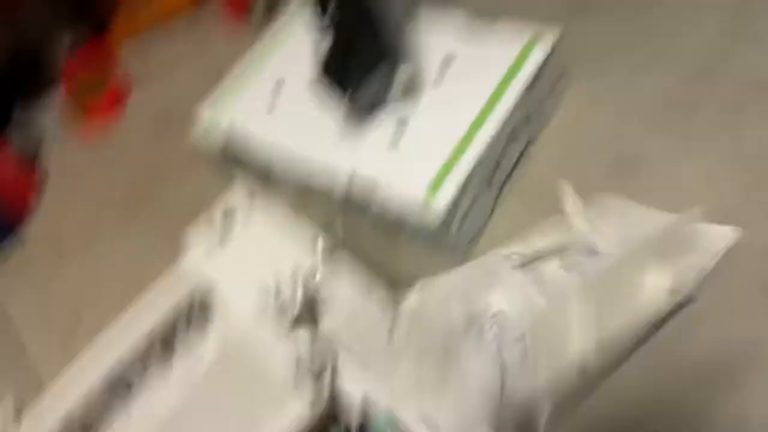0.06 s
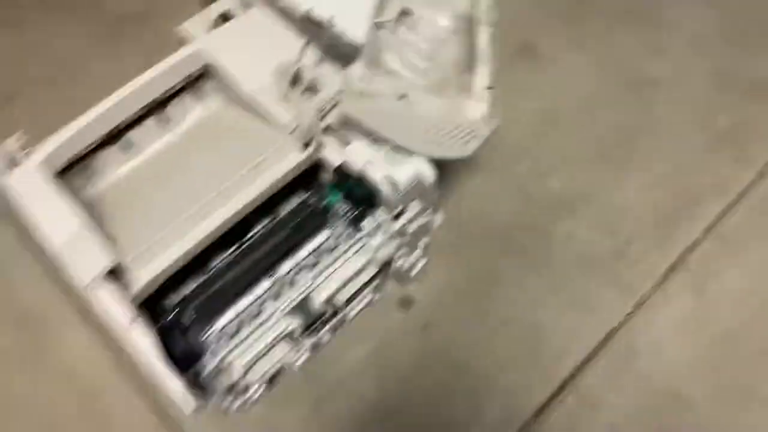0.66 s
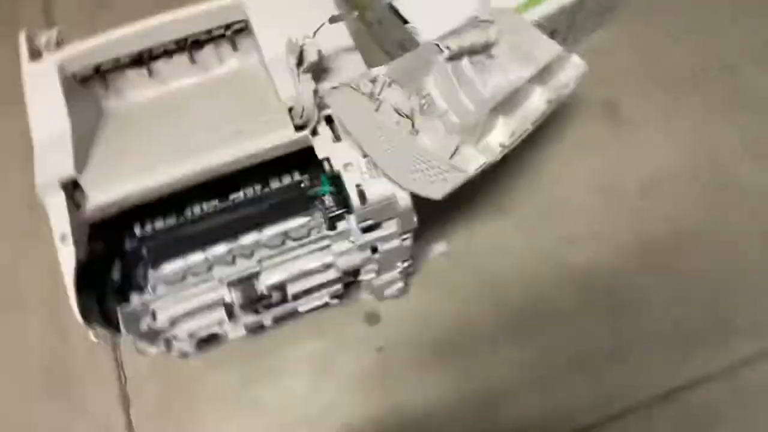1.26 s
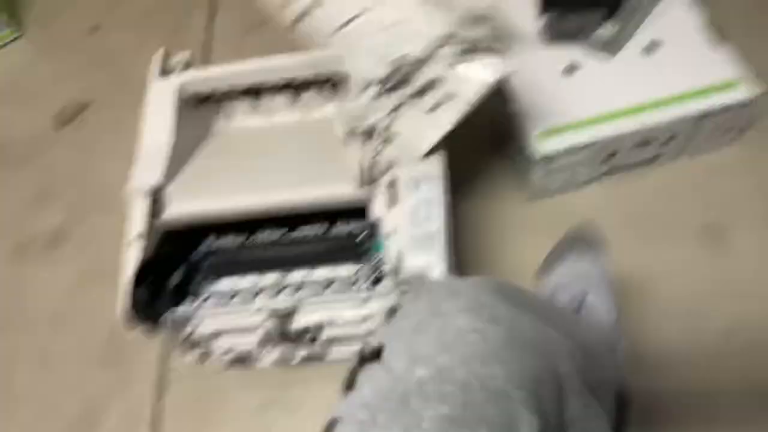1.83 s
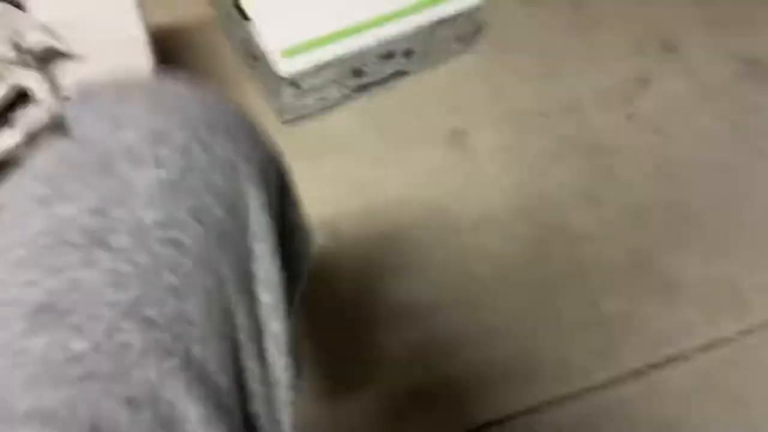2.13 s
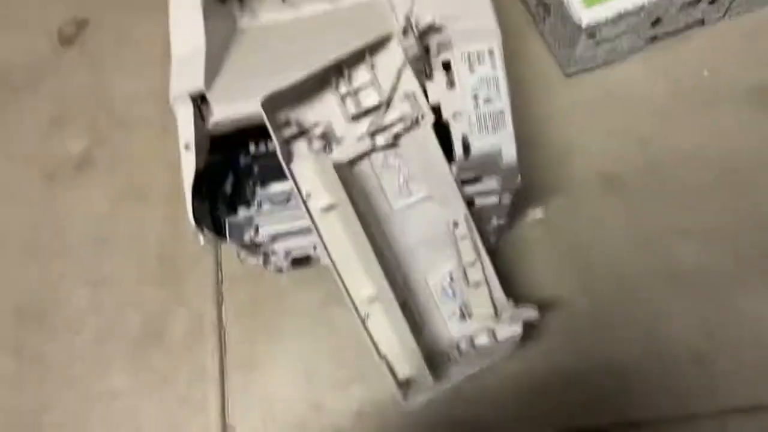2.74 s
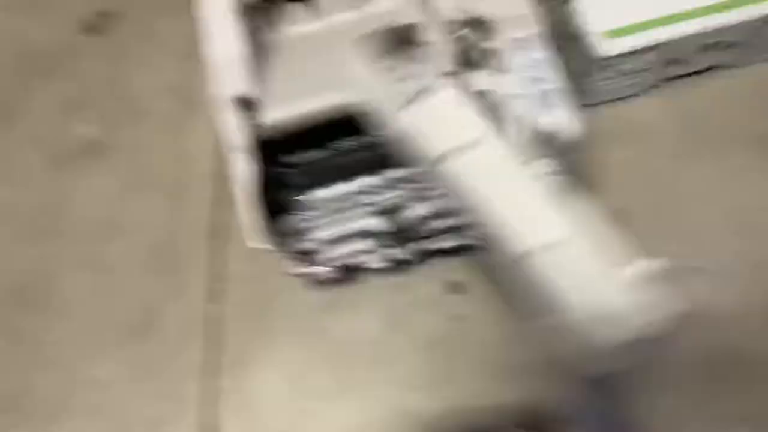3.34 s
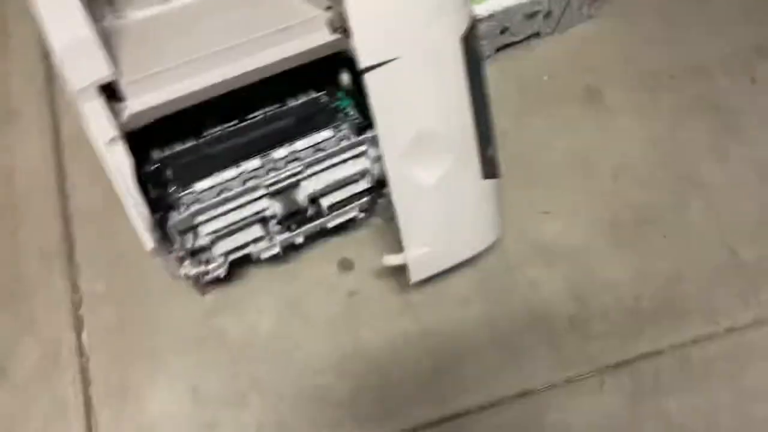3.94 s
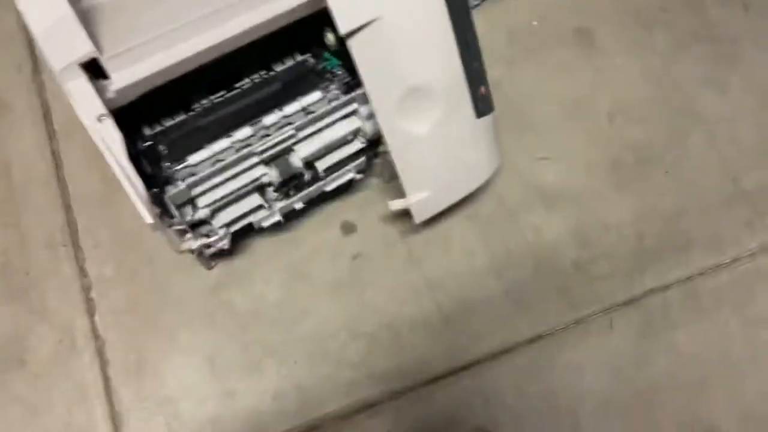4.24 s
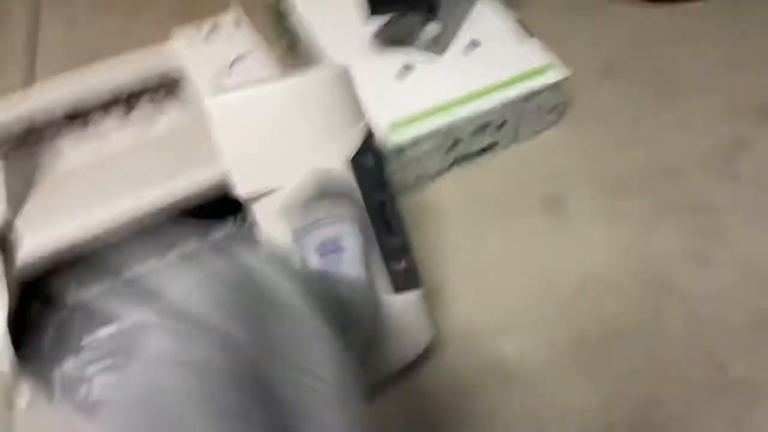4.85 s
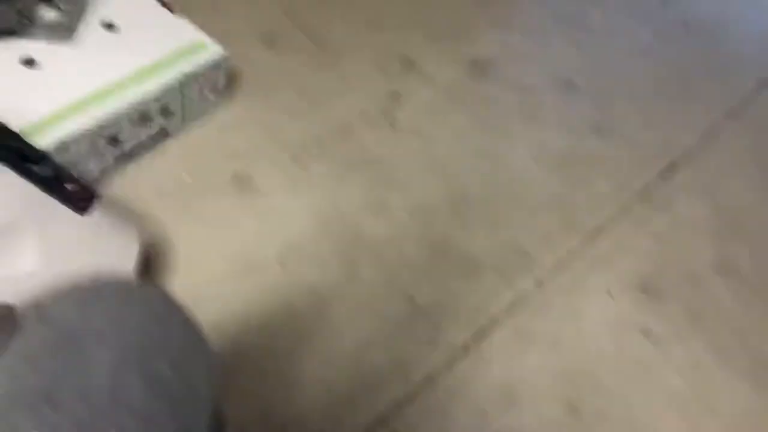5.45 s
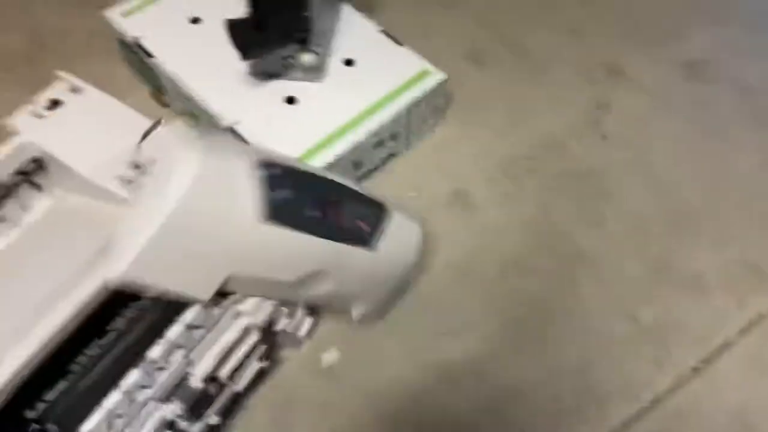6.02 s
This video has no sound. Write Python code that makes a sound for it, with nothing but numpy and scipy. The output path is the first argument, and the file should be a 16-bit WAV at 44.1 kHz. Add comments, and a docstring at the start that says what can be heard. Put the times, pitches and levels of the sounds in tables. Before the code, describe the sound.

Close up in a bare, ringing room, someone kicks a printer's plastic casing apart. A sharp crash opens, then a run of hollow knocks and rattles as a freed panel bounces around. Heavy cracking blows and boomy bumps come next, and after a short pause another loud break with smaller knocks and a last little snap. Light shoe scuffs and a faint fan hum lie underneath.

```python
"""Hard plastic panels are kicked and stamped off a printer on a concrete floor, in a bare, ringing room.
Each kick pushes until a panel gives way in a burst of cracks that rings the hollow housing.
Tabs snap; a loose panel clatters down. Shoes scuff and graze, trousers swish, a fan hums faintly.
The close microphone's gain control ducks the blows and lets the echo swell after them."""
import sys
import numpy as np
from scipy import signal
from scipy.fft import rfft, irfft, next_fast_len
from scipy.io import wavfile
from scipy.ndimage import uniform_filter1d, minimum_filter1d

SR = 44100
rng = np.random.default_rng(int(sys.argv[2]) if len(sys.argv) > 2 else 0)


def waveform_to_disk(signal):
    """Save audio, clipped to [-1, 1], as 16-bit WAV at the path in sys.argv[1]."""
    frames = np.transpose(np.atleast_2d(signal))
    scaled = np.clip(frames, -1, 1) * 32767
    samples = np.round(scaled).astype(np.int16)
    wavfile.write(sys.argv[1], SR, samples)


N = 272758

# foot breaks a panel: t/s, push/dB, push/s, break/dB, hardness/dB, rise/s, break fade/s, thud/dB
PANEL_KICKS = [(0, 7.5, .002, 3, 1.5, 0.00064, 0.019, -16), (1.555, -17, 0.018, 1, -6, 0.013, 0.0051, -36),
               (3.209, 5.5, .011, 6, -1, 0.0023, 0.028, -13),
               (3.576, -15, 0.045, 6, -1.5, 0.005, 0.027, -29),
               (4.818, 0.5, .019, 8, 7.5, .007, 0.014, -11.5),
               (5.232, -10.5, .021, 2.5, 4.5, .007, 0.038, -12.5),
               (5.639, -18, 0.054, -15.5, 8, 0.009, 0.041, -27.5)]
# boom, knock, crack and splinter bands of the plastic: low/Hz, high/Hz, t60/s
PLASTIC_BANDS = [(160, 470, 0.025), (414, 1875, 0.039), (1780, 5310, 0.1), (5700, 14200, 0.065)]
# housing resonances and notches: f/Hz, width/Hz, gain/dB
HOUSING_MODES = [(290, 53, 6), (392, 410, 4), (597, 76, 5), (770, 54, 3), (934, 91, 4), (1456, 20, -6),
                 (2740, 110, 0.5), (3406, 34, 5), (4060, 36, -4.5), (4780, 120, -12.5), (5300, 91, -20)]
# tabs break: t/s, level/dB, relative splinter/dB, fade/s
TAB_SNAPS = [(.087, 2, 6.5, 0.0011), (.325, -30.5, -3.5, 0.028), (1.728, -17.5, -6.5, .03),
             (1.827, -8.5, -3.5, .021), (2.61, -25, -10, 0.0082), (6.034, -23.5, -2, 0.022)]
# loose panel lands and clatters: t/s, level/dB, resonance/Hz, fade/s
PANEL_BOUNCES = [(1.636, -6.5, 890, 0.037), (1.789, -5.5, 980, 0.0085), (1.937, -3.5, 660, 0.12),
                 (1.988, 2, 670, 0.03), (2.04, 3.5, 700, 0.014), (2.064, -1.5, 810, 0.06),
                 (2.16, -6.5, 900, 0.017), (2.335, -21, 780, 0.018), (2.4, 1, 580, 0.0062),
                 (2.424, -9.5, 960, .021), (2.454, -4.5, 850, 0.031), (2.504, 0, 1020, 0.0023),
                 (2.547, -6.5, 760, 0.0025), (2.591, -5, 620, .005)]
# housing hits the floor: t/s, level/dB, hardness/dB
HOUSING_BUMPS = [(.378, -27.5, 4), (3.243, 1.5, -11.5), (3.485, -22, -2.5), (3.692, -3, 8),
                 (3.735, -22, 5.5), (5.075, -20, 2), (5.523, -19.5, 5)]
# soft noise swells after blows: t/s, level/dB, spacing/s, loss per swell/dB
AFTER_SWELLS = [(.205, -24, .185, 9), (3.391, -22.5, .07, 10), (3.815, -30, 0.15, 16),
                (5.04, -23.5, 0.17, 17), (5.975, -32.5, .15, -0.5)]
# small parts and panel edges ring: t/s, f/Hz, level/dB
PART_PINGS = [(.088, 9180, 4), (0.09, 13230, 2), (0.087, 4950, 1), (1.575, 9400, -14),
              (1.576, 13600, -15.5), (1.829, 2524, 0.5), (1.83, 2287, -2), (1.836, 990, -2),
              (2.064, 760, 9), (3.539, 880, -14)]
# foot or panel lands softly: t/s, level/dB, fade/s
FLOOR_THUDS = [(1.108, -55.5, 0.12), (1.666, -8.5, 0.023), (1.79, -38, .05), (1.94, -24.5, 0.11),
               (2.399, -30.5, 0.095), (4.39, -60, 0.042), (5.801, -42.5, .15)]
# shoe scuffs and grazes: t/s, level/dB, fade/s
SHOE_SCUFFS = [(1.045, -52.5, 0.034), (1.115, -58, 0.018), (1.225, -56, 0.059), (1.409, -45.5, 0.022),
               (1.547, -31, 0.026), (3.188, -48.5, .015), (4.405, -59, 0.037), (4.65, -55, 0.16),
               (4.807, -26, 0.017)]
# trouser leg swings: t/s, level/dB, rise/s, fade/s
LEG_SWISHES = [(1.311, -62.5, 0.19, 0.12), (3.112, -67, 0.064, 0.073), (4.391, -78, 0.036, 0.066),
               (4.62, -61, 0.19, 0.066)]
# room decay: f/Hz, t60/s
ECHO_DECAY = [(100, 0.5), (260, 0.4422), (700, 0.37), (1840, 0.5), (4850, 0.41), (9000, 0.3025),
              (15000, 0.16)]
# room colour: f/Hz, gain/dB
ECHO_COLOUR = [(100, -6.5), (300, 3.5), (1000, 5), (3000, 1.5), (7000, 5), (15000, -0.5)]
# still air: f/Hz, relative density/dB
AIR_SPECTRUM = [(20, -27), (40, -21), (62, -0.5), (130, -7), (300, -4), (600, -8.5), (1500, -19),
                (4000, -25.5), (8000, -32.5), (15000, -40)]


def kicks():
    """The push booms in the housing and shakes the floor, then the panel breaks with a crash."""
    out = np.zeros(N)
    for t_s, push_db, push_s, break_db, hard_db, rise_s, fade_s, thud_db in PANEL_KICKS:
        push_hard_db = 0.41 * hard_db
        push = knock(push_db, boom_db=-3, crack_db=push_hard_db - 3.5,
                     splinter_db=1.1 * push_hard_db - 12.5,
                     panel_hz=1160, rise_s=rise_s, fade_s=1.7 * push_s)
        crash = knock(break_db, boom_db=0.2 * hard_db - 6, crack_db=hard_db - 4.5,
                      splinter_db=1.1 * hard_db - 8.5,
                      panel_hz=1270 * 2 ** (-2.66 * hard_db), rise_s=rise_s, fade_s=fade_s)
        add(out, t_s, push)
        add(out, t_s + push_s, crash)
        add(out, t_s + push_s / 2, thud(thud_db, fade_s=0.052, low_hz=56, high_hz=188))
    return out


def knock(level_db, boom_db, crack_db, splinter_db, panel_hz, rise_s, fade_s,
          contacts_per_s=1100, spread_db=4.5, panel_width_hz=300, panel_db=7.5, top_hz=9000, trim_db=-3):
    """A blow is a cluster of uneven contacts, each ringing the plastic's crowded, damped modes."""
    out, t = 0, np.arange(SR // 3) / SR
    soft_pole = np.exp(-2 * np.pi * top_hz / SR)   # finite contact hardness
    force = swell(t, rise_s, fade_s)
    touches = rng.random(len(t)) < contacts_per_s / SR
    sizes = from_db(spread_db * np.clip(rng.standard_normal(len(t)), -2, 1.5))
    clicks = touches * sizes * rng.choice([-1, 1], len(t)) * force
    clicks[round(rise_s * SR)] += 1   # plastic gives way at full force
    for (low_hz, high_hz, t60_s), rel_db in zip(PLASTIC_BANDS, (boom_db, 0, crack_db, splinter_db)):
        ring = rng.standard_normal(len(t)) * np.sqrt(linger(clicks ** 2, t60_s))
        voice = 0.6 * clicks + ring
        for hz, width_hz, gain_db in HOUSING_MODES + [(panel_hz, panel_width_hz, panel_db)]:
            if low_hz < hz < high_hz:
                voice = resonate(voice, hz, width_hz, gain_db)
        voice = signal.lfilter([1], [1, -soft_pole], voice)
        voice = band(voice, low_hz, high_hz, order=3)
        out = out + at_level(voice, force, level_db + rel_db + trim_db)
    return out


def snaps():
    """Small brittle tabs break with mostly treble."""
    out = np.zeros(N)
    for t_s, level_db, splinter_db, fade_s in TAB_SNAPS:
        add(out, t_s, knock(level_db, boom_db=-4, crack_db=3, splinter_db=splinter_db,
                            panel_hz=2510, rise_s=0.16 * fade_s, fade_s=fade_s))
    return out


def bounces():
    """The free panel sounds hollow and dull; its pitch depends on where it lands."""
    out = np.zeros(N)
    for t_s, level_db, panel_hz, fade_s in PANEL_BOUNCES:
        add(out, t_s, knock(level_db, boom_db=-10.5, crack_db=-9.5, splinter_db=-19,
                            panel_hz=panel_hz, rise_s=0.0025, fade_s=fade_s))
    return out


def bumps():
    """The machine drops back with short, boomy knocks."""
    out = np.zeros(N)
    for t_s, level_db, hard_db in HOUSING_BUMPS:
        add(out, t_s, knock(level_db, boom_db=1.5, crack_db=hard_db - 7,
                            splinter_db=1.2 * hard_db - 16.5,
                            panel_hz=1180, rise_s=0.0019, fade_s=0.012))
    return out


def after_swells(count=4):
    """Soft, fading swells of noise follow the loud blows; weaker repeats are duller."""
    out = np.zeros(N)
    for t_s, level_db, spacing_s, loss_db in AFTER_SWELLS:
        for k in range(count):
            start_s, dull_db = t_s + k * spacing_s, 0.21 * k * loss_db
            if start_s * SR < N - 1:
                noise = knock(level_db - k * loss_db, boom_db=-4.5, crack_db=-1.5 - dull_db / 2,
                              splinter_db=-10 - 2 * dull_db, panel_hz=1156, rise_s=0.012, fade_s=0.056)
                add(out, start_s, noise)
    return out


def pings(detune=0.035, t60_at_1khz_s=0.033, modes=7):
    """Close modes beat as they die; small stiff parts ring longer than broad panels."""
    out, t = np.zeros(N), np.arange(SR // 4) / SR
    for t_s, hz, level_db in PART_PINGS:
        t60_s = t60_at_1khz_s * np.cbrt(hz / 1000)
        modes_hz = hz * (1 + detune * rng.standard_normal((modes, 1)))
        tone = np.mean(np.sin(2 * np.pi * modes_hz * t), axis=0)
        add(out, t_s, from_db(level_db) * tone * swell(t, 0.00067, t60_s / np.log(1000)))
    return out


def thuds():
    """Weight comes down on the floor."""
    out = np.zeros(N)
    for t_s, level_db, fade_s in FLOOR_THUDS:
        add(out, t_s, thud(level_db, fade_s))
    return out


def thud(level_db, fade_s, low_hz=50, high_hz=165, rise_s=0.014):
    """A soft, heavy contact moves only the lows."""
    t = np.arange(SR // 2) / SR
    force = swell(t, rise_s, fade_s)
    rumble = band(force * rng.standard_normal(len(t)), low_hz, high_hz, order=3)
    return at_level(rumble, force, level_db)


def scuffs():
    """Faint shoe scuffs, and light grazes just before a kick lands."""
    out = np.zeros(N)
    for t_s, level_db, fade_s in SHOE_SCUFFS:
        add(out, t_s, knock(level_db, boom_db=-9.5, crack_db=-6.5, splinter_db=-21,
                            panel_hz=903, rise_s=0.21 * fade_s, fade_s=fade_s))
    return out


def cloth(low_hz=5000, high_hz=16000):
    """Fabric rubs on fabric: a soft, high hiss."""
    out, t = np.zeros(N), np.arange(SR // 2) / SR
    for t_s, level_db, rise_s, fade_s in LEG_SWISHES:
        force = swell(t, rise_s, fade_s)
        hiss = band(force * rng.standard_normal(len(t)), low_hz, high_hz, order=1)
        add(out, t_s, at_level(hiss, force, level_db))
    return out


def room(x, wet_db=-3, shifts_per_s=90, spots=3):
    """Contacts shift between spots on the machine, each with its own echo path."""
    turns = (shifts_per_s * np.arange(N) / SR - np.arange(spots)[:, None]) / spots
    shares = np.maximum(np.cos(2 * np.pi * turns), 0)
    shares /= np.sqrt(np.sum(shares ** 2, axis=0))
    echo = sum(signal.oaconvolve(x * share, echo_path())[:N] for share in shares)
    return x + from_db(wet_db) * echo


def echo_path(first_echo_s=0.002, build_s=0.003):
    """Floor and walls return a dense echo whose treble dies first; unit energy."""
    t = np.arange(3 * SR // 4) / SR
    edges_hz = 45 * 2 ** (np.arange(14) / 1.5)
    echo = np.zeros(len(t))
    for low_hz, high_hz in zip(edges_hz, edges_hz[1:]):
        hz = np.sqrt(low_hz * high_hz)
        decay = np.exp(-np.log(1000) * t / at_hz(ECHO_DECAY, hz))
        noise = band(rng.standard_normal(len(t)), low_hz, high_hz)
        echo += from_db(at_hz(ECHO_COLOUR, hz)) * noise * decay
    echo *= np.clip((t - first_echo_s) / build_s, 0, 1)
    return echo / np.sqrt(np.sum(echo ** 2))


def air_and_fan(air_db=-60.5, hum_db=-60.5, hum_hz=353.6, width_hz=11):
    """Quiet air and the slightly unsteady tone of a distant fan."""
    size = next_fast_len(N)
    colour = from_db(at_hz(AIR_SPECTRUM, np.arange(size // 2 + 1) * SR / size))
    air = irfft(rfft(rng.standard_normal(size)) * colour, size)[:N]
    hum = band(rng.standard_normal(N), hum_hz - width_hz / 2, hum_hz + width_hz / 2)
    return from_db(air_db) * rms_one(air) + from_db(hum_db) * rms_one(hum)


def swell(t, rise_s, fade_s):
    """Force builds, then dies away."""
    return np.minimum(t / rise_s, 1) * np.exp(-np.maximum(t - rise_s, 0) / fade_s)


def linger(power, t60_s):
    """Stored energy leaks away exponentially."""
    pole = from_db(-120 / (t60_s * SR))
    return signal.lfilter([1 - pole], [1, -pole], power + 1e-18)


def resonate(x, hz, width_hz, gain_db):
    """One resonance; a notch if gain_db < 0."""
    r = np.exp(-np.pi * width_hz / SR)
    feedback = [1, -2 * r * np.cos(2 * np.pi * hz / SR), r * r]
    peak = signal.lfilter(np.array([1, 0, -1]) * (1 - r * r) / 2, feedback, x)
    return x + (from_db(gain_db) - 1) * peak


def band(x, low_hz, high_hz, order=2):
    sos = signal.butter(order, [low_hz, min(high_hz, SR / 2 - 1)], "band", fs=SR, output="sos")
    return signal.sosfilt(sos, x + 1e-18)


def at_hz(points, hz):
    """Table lookup on a log-frequency axis."""
    known_hz, values = np.transpose(points)
    return np.interp(np.log(np.maximum(hz, 1)), np.log(known_hz), values)


def at_level(x, force, level_db):
    """Sets a burst's rms at full force."""
    return from_db(level_db) * x * np.sqrt(np.sum(force ** 2) / np.sum(x ** 2))


def from_db(db):
    return 10 ** (np.asarray(db) / 20)


def rms_one(x):
    return x / np.sqrt(np.mean(x ** 2) + 1e-20)


def add(out, t_s, sound):
    start = max(round(t_s * SR), 0)
    out[start:start + len(sound)] += sound[:N - start]


def scene():
    """Contacts and swells ring in the room; cloth, air and fan are heard directly."""
    sources = kicks() + snaps() + bounces() + bumps() + after_swells() + scuffs() + pings() + thuds()
    return (room(sources) + cloth() + air_and_fan())[None]


def gain_control(x, threshold_db=-9.5, hold_s=0.13, release_db_per_s=71, attack_s=0.0027,
                 ahead_s=0.00099):
    """Loud blows pull the gain down just ahead of their peak; it holds, then climbs back."""
    t, half_hold = np.arange(N) / SR, int(hold_s * SR / 2)
    level_db = 10 * np.log10(np.maximum(uniform_filter1d(x ** 2, SR // 100), 1e-12))
    over_db = np.maximum(level_db - threshold_db, 0)
    held_db = -minimum_filter1d(-over_db, 2 * half_hold + 1, origin=half_hold)
    cut_db = np.maximum.accumulate(held_db + release_db_per_s * t) - release_db_per_s * t
    pole = np.exp(-1 / (attack_s * SR))
    cut_db = signal.lfilter([1 - pole], [1, -pole], cut_db)
    return x * from_db(-np.interp(t + ahead_s, t, cut_db))


def record(dry, low_hz=45, high_hz=16000, ceiling=0.8):
    """Microphone chain: rumble cut, gain control, rounded peaks, top cut."""
    x = signal.sosfilt(signal.butter(4, low_hz, "high", fs=SR, output="sos"), dry[0])
    x = gain_control(x)
    x = x / (1 + (x / ceiling) ** 6) ** (1 / 6)
    return signal.sosfilt(signal.ellip(12, 0.1, 80, high_hz, fs=SR, output="sos"), x)[None]


dry = scene()
out = record(dry)
waveform_to_disk(out)
```